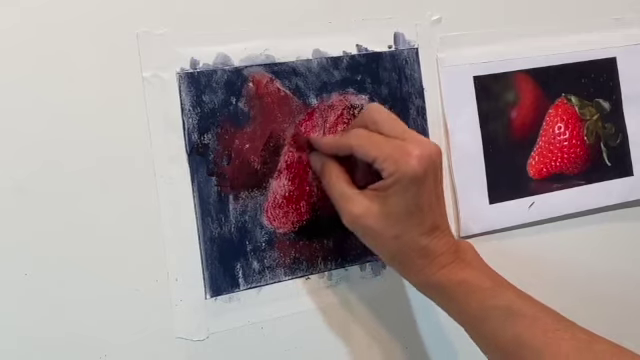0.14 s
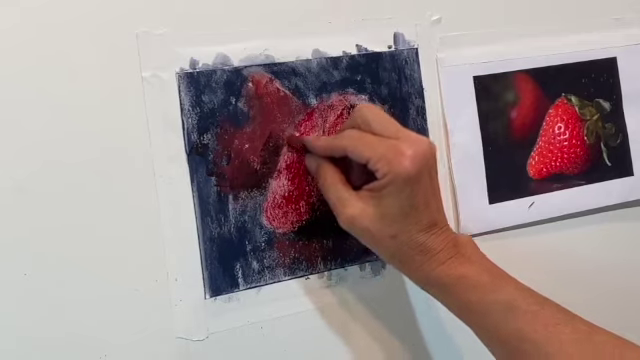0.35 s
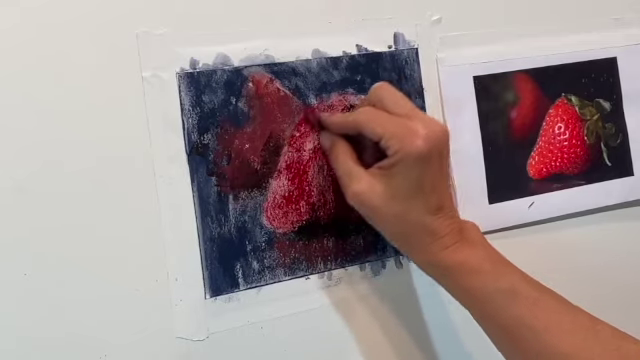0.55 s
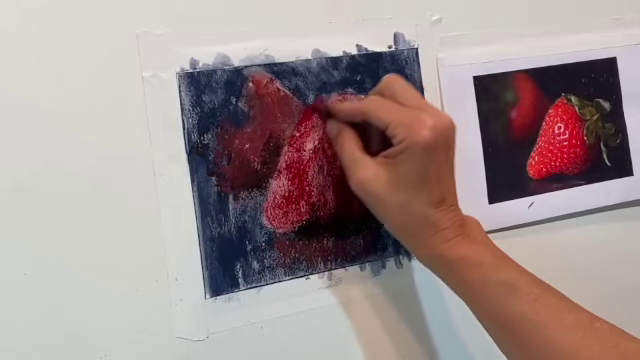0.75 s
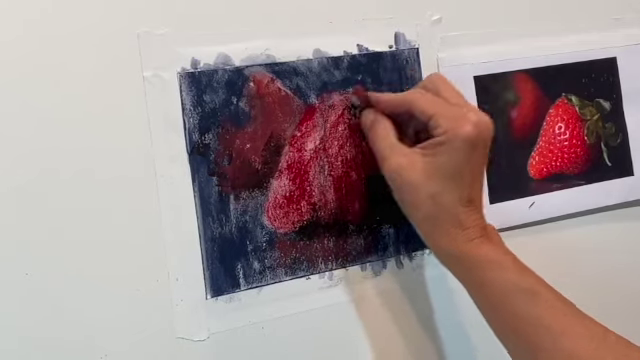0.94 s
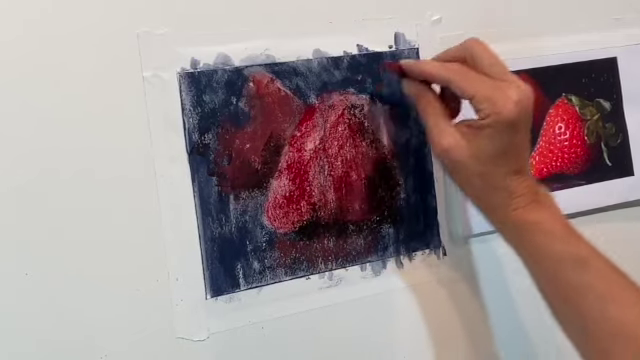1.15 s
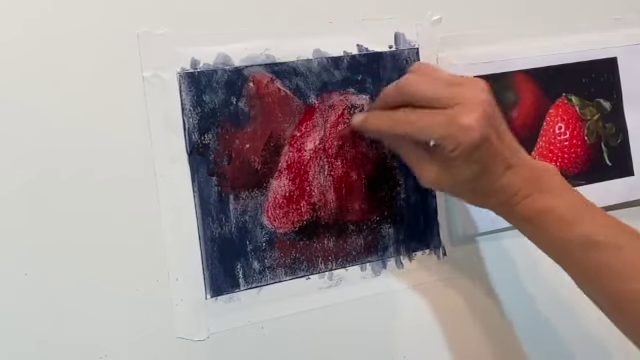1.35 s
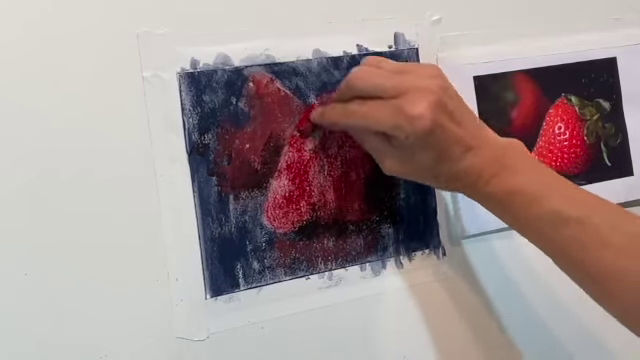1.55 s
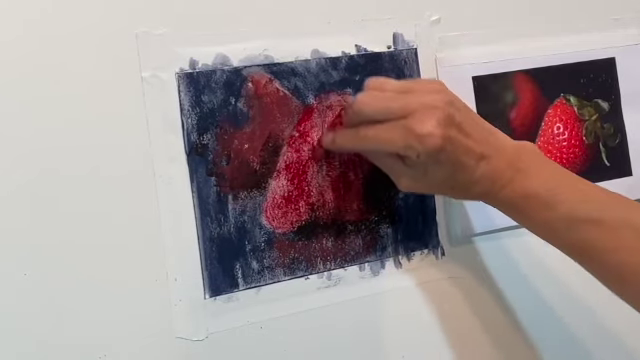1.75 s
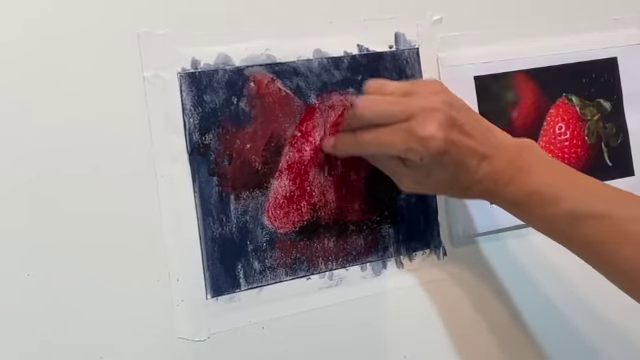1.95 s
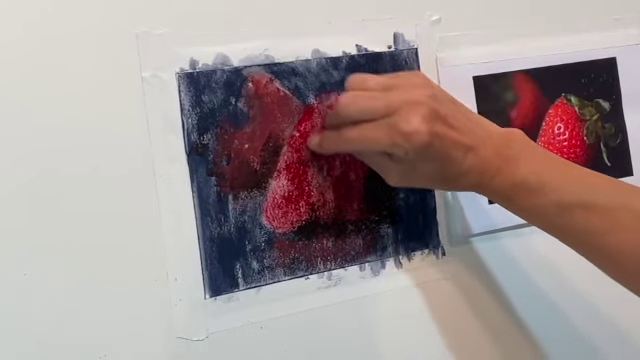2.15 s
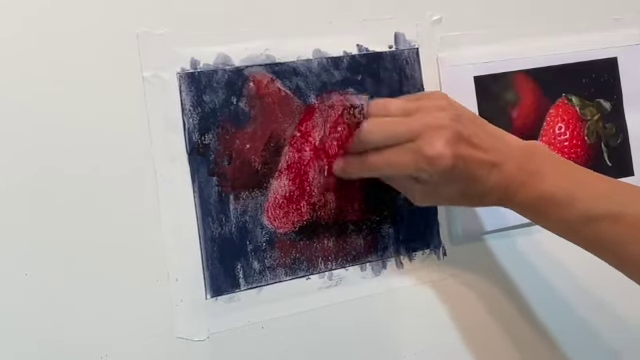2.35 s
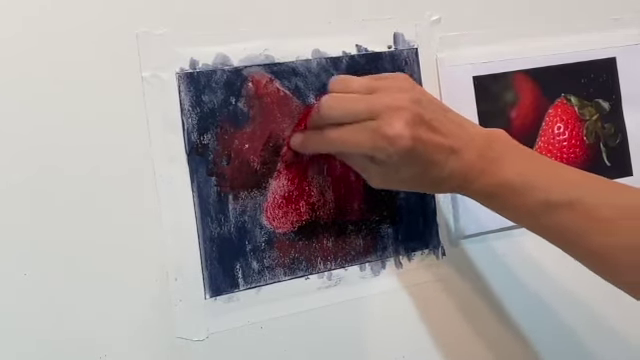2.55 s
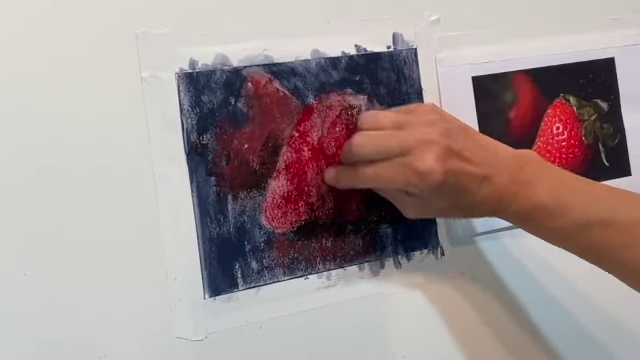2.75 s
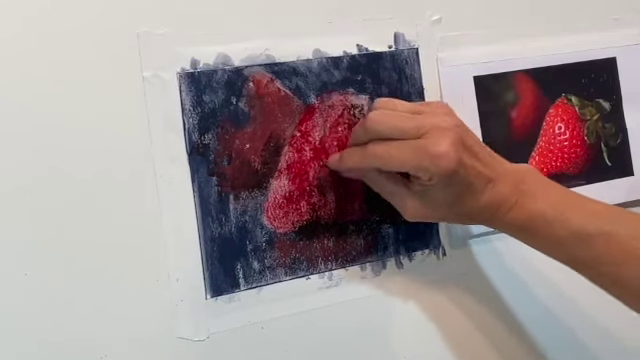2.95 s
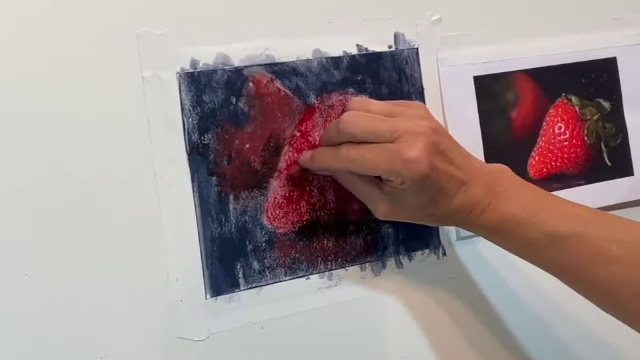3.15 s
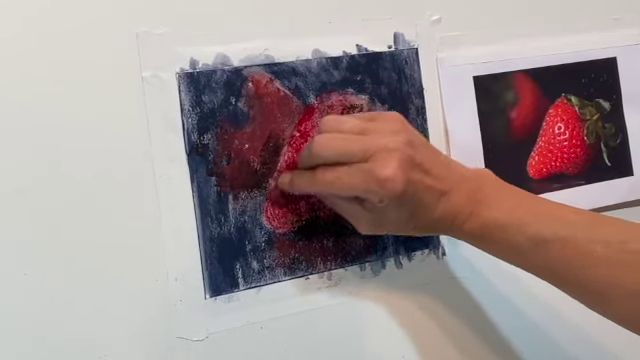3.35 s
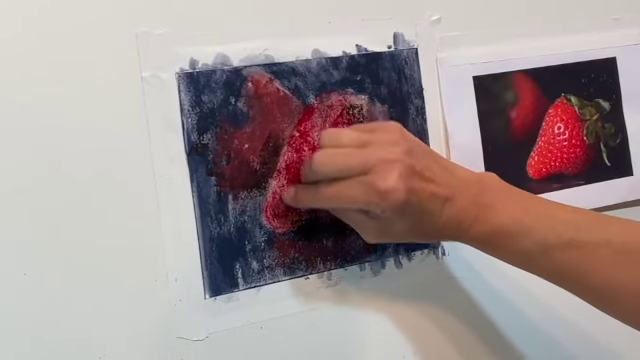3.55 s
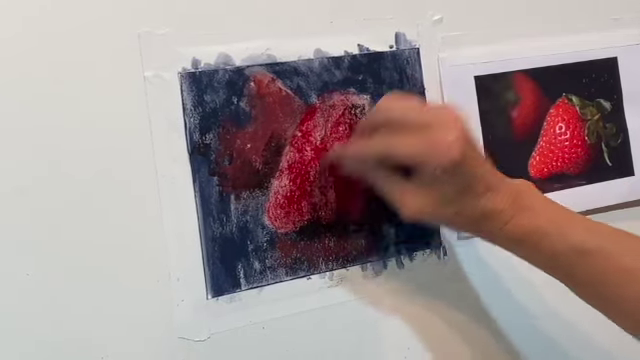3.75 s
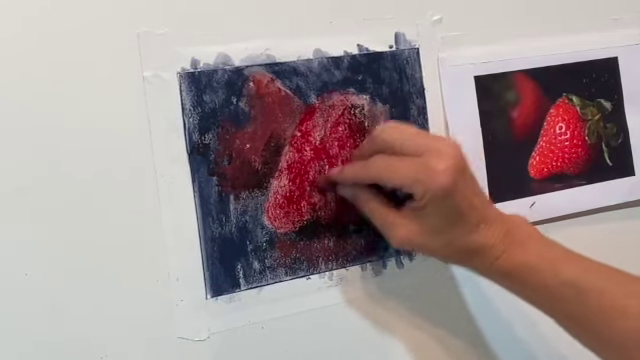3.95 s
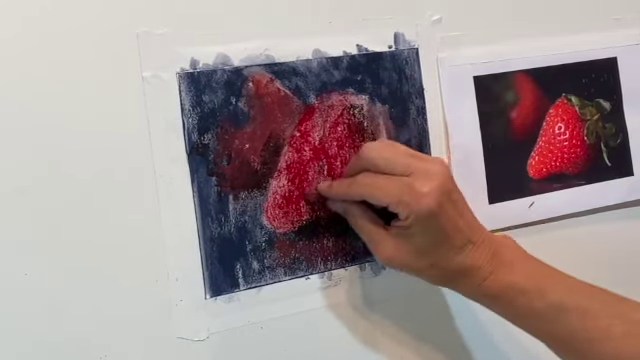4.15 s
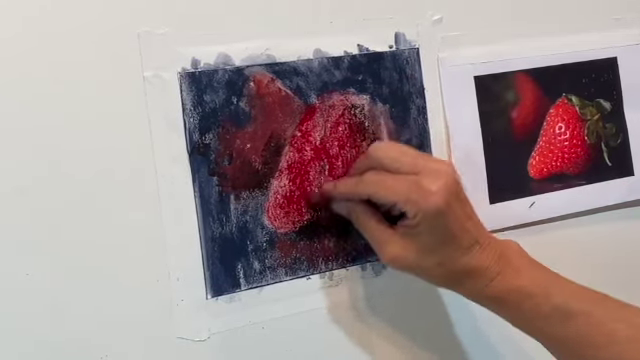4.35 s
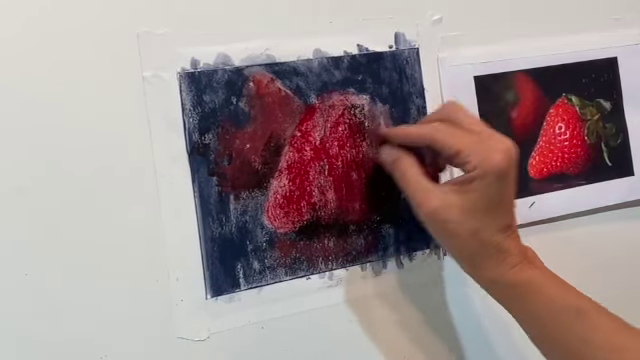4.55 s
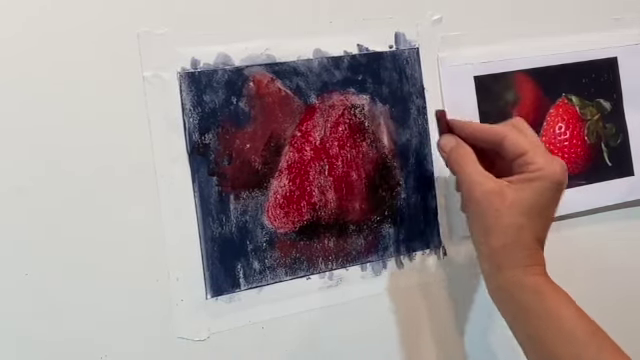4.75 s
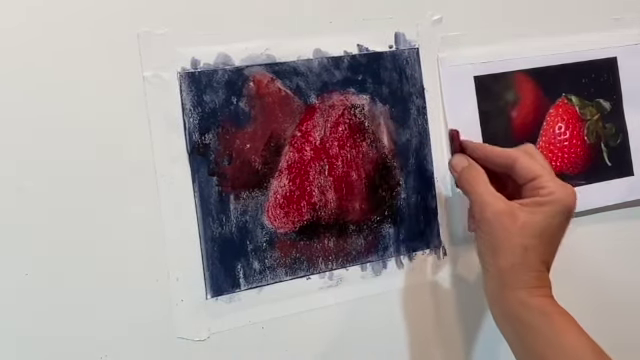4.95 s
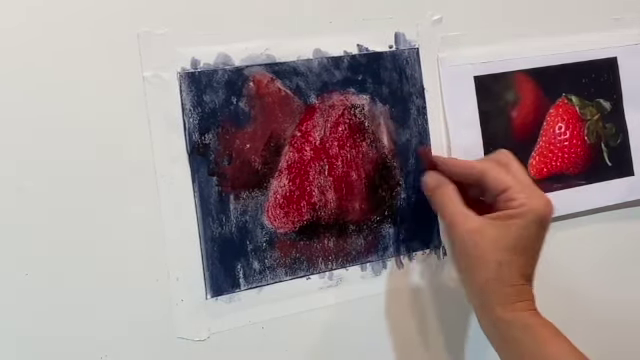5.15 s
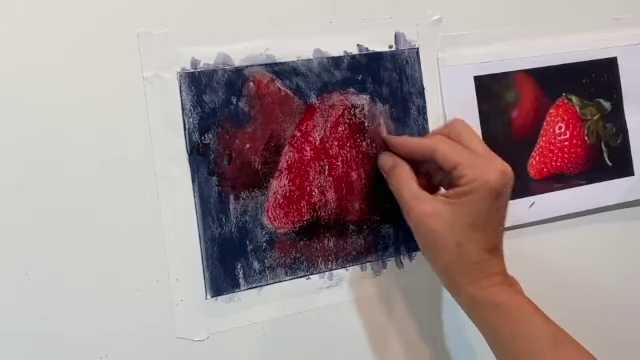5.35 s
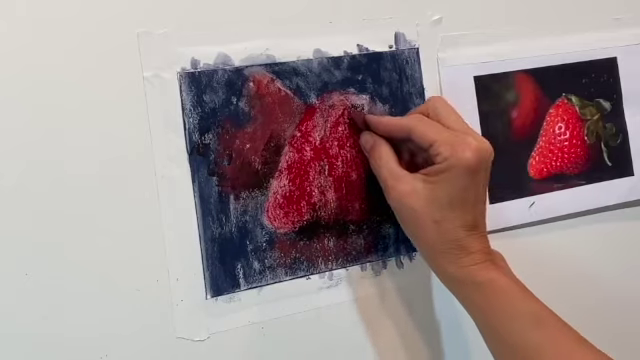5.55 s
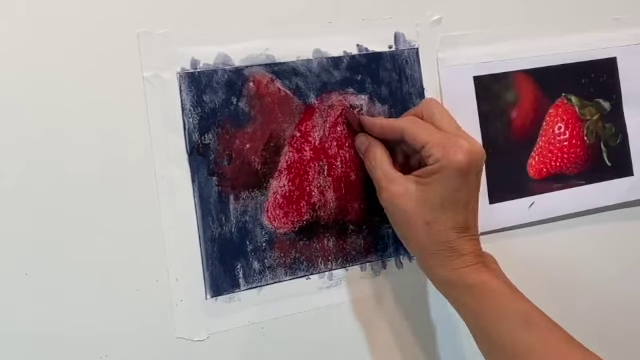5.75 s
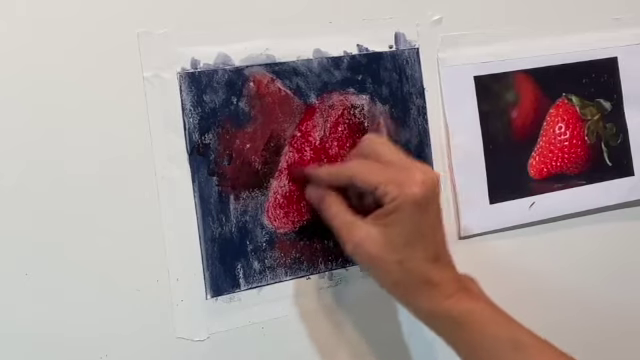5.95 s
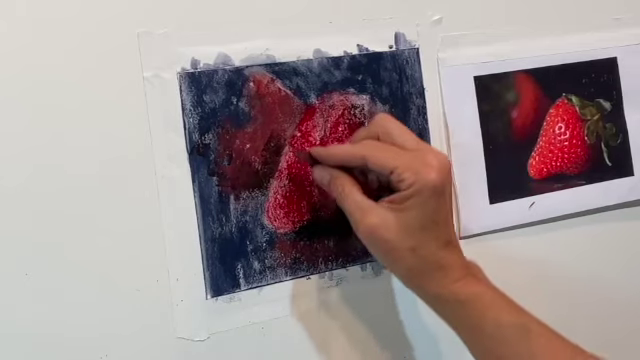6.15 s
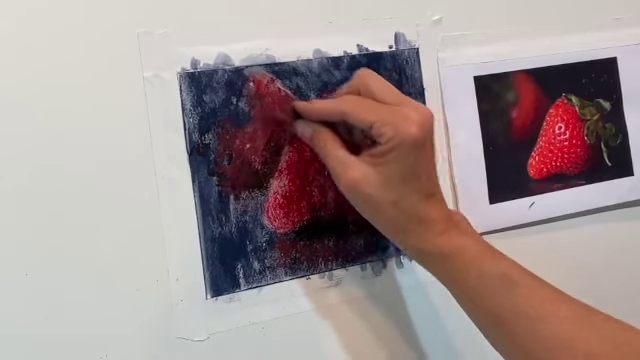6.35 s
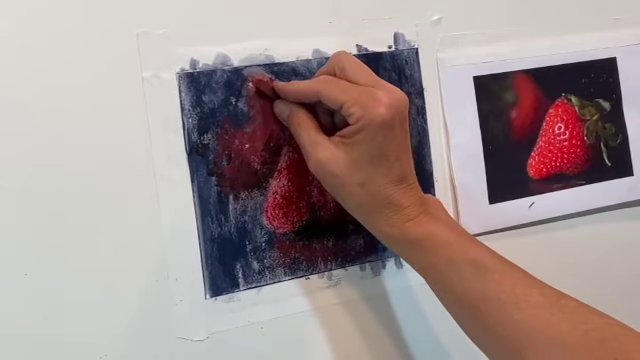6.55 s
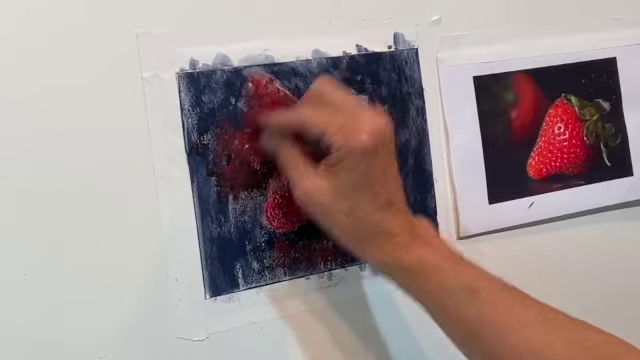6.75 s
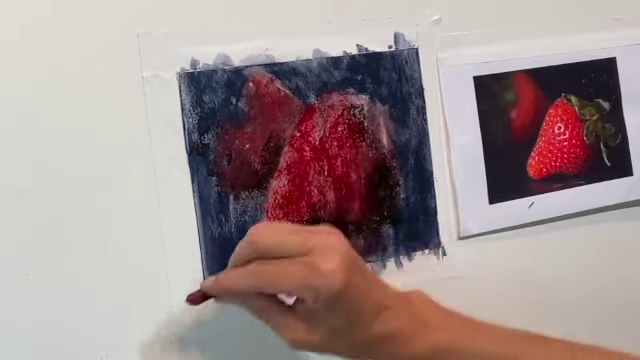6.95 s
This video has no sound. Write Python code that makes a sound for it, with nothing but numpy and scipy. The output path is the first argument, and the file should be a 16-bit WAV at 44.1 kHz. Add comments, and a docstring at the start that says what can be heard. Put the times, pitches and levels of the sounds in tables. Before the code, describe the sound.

A hard pastel stick rubs over rough paper in a quick run of short, dry, scratchy strokes. After a brief pause a second run follows, and the hand and stick land with several dull knocks on the drawing board. The strokes thin out, stop for over a second, then return as two brighter scratches with a soft bump between them. The microphone is close, in a quiet studio with a faint low rumble.

```python
"""A hard pastel stick is rubbed in short strokes over sanded paper taped to a drawing board.
Grit tears crumbs off the stick, and the many small fractures sum to a dense hiss that resonances of
paper and board colour. Stick and hand land with knocks that excite the board's damped modes.
Faint treble puffs, distant whistles and the rumble of a quiet studio lie underneath.
A phone close by spreads the sound over two channels by phase differences."""
import sys
import numpy as np
from scipy import signal
from scipy.fft import rfft, irfft, next_fast_len
from scipy.io import wavfile
from scipy.ndimage import uniform_filter1d

SR = 44100
rng = np.random.default_rng(int(sys.argv[2]) if len(sys.argv) > 2 else 0)


def master(y):
    """Save y as 16-bit WAV."""
    cut = np.clip(np.atleast_2d(y).T, -1, 1)
    pcm = np.round(cut * 32767)  # scale
    wavfile.write(sys.argv[1], SR, pcm.astype(np.int16))


N = 312839
T = np.arange(N) / SR
FFT_SIZE = next_fast_len(N + SR)
HZ = np.fft.rfftfreq(FFT_SIZE, 1 / SR)

# Strokes of the stick. Each row: start, rise, hold and fall in seconds, level in dB, rasp, fine grit and
# board drone in dB over the hiss, brightening from start to end in dB, relative tail level in dB.
STICK_STROKES = [(-0.06, 0.069, 0.023, 0.093, -37.5, -2, -4, -9, -1.5, -13.5),
                 (0.107, 0.029, 0.03, 0.078, -43.5, -7, -5.5, -4.5, 1, -13),
                 (0.226, 0.089, 0.038, 0.089, -38.5, -1, -1.5, -9, 1, -16),
                 (0.415, 0.059, 0.018, 0.092, -41, -5, -5.5, -7, -2.5, -14.5),
                 (0.564, 0.086, 0.069, 0.054, -40.5, 3.5, 4, -6, 18, -10.5),
                 (1.435, 0.035, .005, 0.071, -54, -4, -5, 4.5, 4, -14),
                 (1.543, 0.12, 0.036, 0.12, -38, -2.5, -2.5, -7.5, 0.5, -16),
                 (1.78, 0.065, 0.028, 0.082, -42, 1, -2, -6, -1, -16.5),
                 (1.939, 0.019, 0.0056, 0.069, -43, -7, -9, -7.5, .5, -17),
                 (2.009, 0.071, 0.089, 0.082, -37, -2, -1.5, -5.5, 4, -17),
                 (2.227, 0.037, .005, .035, -48.5, 1.5, -2, 0, -1, -11.5),
                 (2.477, 0.087, 0.083, 0.11, -40, -1.5, -1, -5.5, 4.5, -17),
                 (3.153, 0.092, 0.0088, .11, -40.5, -10, -6.5, -5.5, -4, -18),
                 (3.393, 0.072, 0.098, 0.064, -40.5, -9.5, -8.5, -5.5, 2, -13.5),
                 (3.99, 0.12, 0.014, 0.092, -43, -3.5, -3.5, -5, -4.5, -15),
                 (4.215, .027, 0.004, 0.029, -57, -7, -12, -1.5, .5, -14),
                 (5.666, 0.13, 0.02, 0.052, -38, 10, 11, -6, -13.5, -12),
                 (6.397, 0.0072, 0.029, 0.086, -55, -5.5, 0.5, 10, 14, -18),
                 (6.545, 0.1, 0.016, 0.068, -39, 1, 4.5, -4.5, 12, -15)]
# Scuffs as stick or hand lands. Each row: start in seconds, level in dB, T60 in seconds,
# then rasp, fine grit and board drone in dB over the hiss.
LANDING_SCUFFS = [(0.955, -75, 0.13, -5, -5, 19), (1.445, -57.5, .15, -8, -13, 4),
                  (2.41, -66.5, 0.23, -4, 10, 11), (2.439, -47, .15, -20, -8, 10),
                  (2.46, -52, .06, -8, 0, 5), (2.858, -43.5, 0.19, -19, -13, 11.5),
                  (3.02, -74, 0.58, -13, -1, 19), (3.15, -49.5, 0.23, -21, -6, 5),
                  (3.408, -54, 0.204, -8, -9, 0), (3.709, -51, .09, -15, -6, 8),
                  (3.744, -64.5, 0.23, -15, -3, 19.5), (3.908, -75, 0.17, -19, 0, 9),
                  (3.953, -59, .13, -9, -10, 18), (4.307, -65, 0.17, -4, 2, 1),
                  (4.346, -61, 0.17, -3, 3.5, -1), (5.493, -68, 0.23, -5, 1.5, -3),
                  (5.57, -75.5, 0.15, 4, -5.5, -1), (5.677, -62.5, .2, 5.5, 12.5, -3.5),
                  (6.115, -73.5, 0.19, -7, -3, 2), (6.4, -43, .09, -18, -20, 3),
                  (6.552, -60.5, .2, -2, -1, 1)]
# Spectrum of breaking crumbs. Each row: frequency in Hz, relative density in dB.
CRUMB_SPECTRUM = [(60, -3), (150, 2.5), (500, -3), (900, 0), (2500, -3), (4000, -6.5), (5600, -10.5),
                  (8500, -8), (12500, -7.5), (15500, -9.5)]
# Resonances of paper and board under the stick. Each row: centre and bandwidth in Hz, gain in dB.
SHEET_RESONANCES = [(244.4, 62, 3.5), (732, 60, 4.5), (1110, 128, 5), (1438, 46, 0.5), (1680, 38, -1),
                    (1983, 72, -3), (2580, 400, -2.5), (3950, 91, -21.5)]
# Impacts of stick and hand. Each row: start in seconds, peak in dB, contact time in milliseconds,
# palm weight in dB, boom in dB, share of the ring time, relative tick level in dB.
BOARD_KNOCKS = [(1.444, -41, 1.2, -8, -20, 1, -3), (1.953, -49.5, 1.3, -20, -11, 0.93, -4),
                (2.439, -26, 2.1, -7, -9.5, 0.86, -14), (2.46, -37, 2.2, -11, -14, 0.81, -20),
                (2.489, -27, 1.4, -9, -26, 0.39, -13), (2.86, -19.5, 0.86, -18, -8.5, 1, -55),
                (3.021, -32.5, 1.66, -11.5, -13, 0.52, -38), (3.149, -32, 0.99, -6, -1.5, 0.56, -30),
                (3.17, -41, 0.62, -17, -11, 0.7, -15), (3.407, -56, 0.61, -1, -4, 0.7, -6),
                (3.707, -26.5, 1.3, -9.5, -4, 1, -44), (3.908, -40.5, 2.4, -8, -17, 0.83, -32),
                (3.953, -40.5, 2.7, -22, -18.5, 0.58, -24), (4.24, -52.5, 1.2, -18, -9, 0.7, -3.5),
                (4.309, -47, 1.8, -10, -7, 0.79, -16), (4.346, -43.5, 1.9, -18, -8.5, 0.94, -22),
                (5.494, -50.5, 0.57, -12, -15, 0.33, -8), (6.4, -37, 0.58, 0, -1, 0.58, -6),
                (6.42, -35.5, 1.7, 2.5, -3, 0.39, -2), (6.462, -46.5, 3, -5, -14, 0.96, -30)]
# Modes of the board. Each row: frequency in Hz, gain in dB, T60 in seconds before the hand damps it.
BOARD_MODES = [(53, -1.5, 0.9), (72.4, 8, 0.33), (88.75, 1.5, 0.85), (111.8, 4.5, .5), (156.1, 5.5, 0.25),
               (198.2, -0.5, 0.13), (239.3, -7, 0.31), (278, -4.5, 0.18), (314, -13.5, 0.24),
               (421.5, -8.5, 0.19), (458, -7, 0.23), (572, -9, 0.1), (700, -11.5, 0.11), (929, -6, 0.084),
               (1140, -17.5, 0.14), (1440, -19, 0.14), (1670, -18.5, 0.04), (2447, -22.5, .08)]
# Puffs as the hand moves in the air. Each row: start in seconds, relative peak in dB, length in seconds.
AIR_PUFFS = [(0.942, -71, 0.039), (1.27, -67, 0.042), (2.967, -66, 0.08), (3.0694, -68, 0.042),
             (3.853, -68, 0.038), (4.541, -71.5, 0.041), (4.707, -78.5, 0.037), (4.917, -66, 0.036),
             (5.128, -71, 0.052), (5.565, -71, 0.029), (6.107, -66.5, 0.052), (6.315, -72.5, 0.046),
             (6.991, -74, 0.051)]
# Far whistles, perhaps a bird. Each row: start and length in seconds, starting pitch in Hz, peak in dB.
FAR_WHISTLES = [(4.6, .06, 3600, -92), (4.665, .05, 3300, -89), (4.7, .08, 2600, -89),
                (4.955, .085, 8000, -89), (5.05, .09, 7400, -91), (5.14, .08, 6800, -95)]
# Spectrum of the studio's rumble and air. Each row: frequency in Hz, relative density in dB.
STUDIO_SPECTRUM = [(15, -28.5), (25, 0.5), (92, -9), (135, -13), (164, -10.5), (323, -17.5), (356, -16),
                   (499, -30), (733, -28), (1000, -29.5), (1080, -41), (4940, -57), (8000, -61.5),
                   (10400, -77.5), (17600, -120)]
# Spectra of the puffs and the microphone's hiss. Each row: frequency in Hz, relative density in dB.
PUFF_SPECTRUM = [(2000, -15), (7500, -23.5), (9500, 14.0), (15000, -17.0)]
MIC_SPECTRUM = [(6000, -5.5), (8500, 2.5), (10500, -0.5), (12600, -7.0), (13200, -19), (16000, -22)]
# Phase between left and right. Each row: frequency in Hz, phase difference in half turns.
CHANNEL_PHASE = [(0, 0), (170, .08), (450, .08), (520, -.14), (800, -.32), (1000, -.42), (1500, -.36),
                 (2200, 0), (7400, 0), (8700, 1), (9550, 1), (10700, 2), (11400, 2), (12900, 3), (13650, 3),
                 (14900, 4)]

HISS_POWER, RASP_POWER, DRONE_POWER = 2.13, 1.72, 0.62  # amplitude follows speed to these powers
SCUFF_RISE_S, TAIL_T60_S = .003, 0.32
STUDIO_DB, MIC_HISS_DB = -55.5, -91.5
ROOM_T60_S, ROOM_DB = .28, -15
FLUTTER_RAD, FLUTTER_PER_S = 1.3, 120


def rubbing():
    """Friction noise: crumbs of many sizes break off and drive the resonances of paper and board."""
    crumbs = rng.standard_normal(N)
    crumbs *= undb(1.3 * rng.exponential(size=N) + 0.5 * walk(300) + 1.3 * walk(40))
    crumbs = shape(crumbs, spectrum(CRUMB_SPECTRUM))
    # the stick wanders over the board, so the strong resonances and the many small ones come and go
    rings = sum(undb(db + 4.2 * walk(6)) * shape(crumbs, 1 / (1 + 1j * (HZ - hz) * 2 / width))
                for hz, width, db in SHEET_RESONANCES)
    small_modes = sum(undb(2.4 * walk(7)) * shape(crumbs, diffuse_tail(0.076)) for _ in range(3))
    sheet = crumbs + rings + undb(-7.0) * small_modes
    low, mid, high = (1 / (1 + (HZ / hz) ** 5) for hz in (950, 3000, 7500))  # low-pass gains
    bands = mid - low, high - mid, 1 - high, low  # hiss, rasp, fine grit, drone
    envelopes = np.sqrt(stroke_power() + scuff_power())  # incoherent sources add in power
    return sum(envelope * set_rms(shape(sheet, band), 0) for envelope, band in zip(envelopes, bands))


def stroke_power():
    """Each friction band follows a power law of speed; a short room tail lingers after each stroke."""
    power = np.zeros((4, N))
    exponents = np.array([[HISS_POWER], [RASP_POWER], [RASP_POWER], [DRONE_POWER]])
    for start, rise, hold, fall, db, rasp_db, fine_db, drone_db, brighten_db, tail_db in STICK_STROKES:
        span = slice(max(int(start * SR), 0), int(start * SR) + SR)
        t, length = T[span] - start, rise + hold + fall
        speed = np.sin(np.pi / 2 * np.clip(np.minimum(t / rise, (length - t) / fall), 0, 1))
        tail_onset = np.clip((t - rise - hold) / fall, 0, 1)
        tail = tail_onset * undb(tail_db - 60 * np.maximum(t - length, 0) / TAIL_T60_S) ** 2
        tilt_db = brighten_db * (np.minimum(t / length, 1) - .5)
        full_power = band_power(db, rasp_db + tilt_db, fine_db + tilt_db, drone_db)
        power[:, span] += full_power * (speed ** (2 * exponents) + tail)
    return power


def scuff_power():
    """Transient friction: the power of a landing rises almost at once and decays exponentially."""
    power = np.zeros((4, N))
    for start, db, t60, *balance_db in LANDING_SCUFFS:
        t = np.maximum(T - start, 0)
        power += band_power(db - 60 * t / t60, *balance_db) * np.minimum(t / SCUFF_RISE_S, 1)
    return power


def band_power(db, rasp_db, fine_db, drone_db):
    """Partition of power: hiss and rasp share the level; fine grit and drone are set by the hiss."""
    bands_db = np.array(np.broadcast_arrays(db, db + rasp_db, db + fine_db, db + drone_db))
    return undb(2 * bands_db) / (1 + undb(2 * rasp_db))


def knocks():
    """Modal superposition: each impact rings the board's damped modes, led by a short tick of grit."""
    out, t = np.zeros(N + SR), T[:SR // 2]
    hz, mode_db, t60 = np.transpose(BOARD_MODES)[:, :, None]
    mode = np.arange(len(BOARD_MODES))[:, None]
    palm_modes, boom_modes = mode < 3, (mode == 3) | (mode == 4)
    for start, db, contact_ms, palm_db, boom_db, ring_share, tick_db in BOARD_KNOCKS:
        scatter = rng.standard_normal((len(BOARD_MODES), 2))
        gain = undb(mode_db + 2.5 * scatter[:, :1] + palm_db * palm_modes + boom_db * boom_modes)
        gain /= 1 + (hz * contact_ms / 1000) ** 2  # longer contact excites the upper modes less
        detuned_hz = hz * (1 + .015 * scatter[:, 1:])
        swell = 1 - np.exp(-t * hz / 0.51)  # low modes build up more slowly
        fade = undb(-60 * t / (t60 * ring_share))  # a hand left on the board damps it
        ring = np.sum(gain * swell * fade * np.sin(2 * np.pi * detuned_hz * t), axis=0)
        tick = signal.lfilter([.3], [1, -.8], rng.standard_normal(len(t))) * np.exp(-t / 0.0021)
        i = int(start * SR)
        out[i:i + len(t)] += undb(db) * (ring / np.abs(ring).max() + undb(tick_db) * tick)
    return out[:N]


def puffs():
    """Amplitude modulation: Gaussian envelopes shape treble noise into soft bursts."""
    swell = sum(undb(db) * np.exp(-(2 * (T - start) / length - 1) ** 2)
                for start, db, length in AIR_PUFFS)
    return swell * set_rms(noise(spectrum(PUFF_SPECTRUM)), -6)


def whistles(sag_per_s=.5):
    """Linear chirps: each distant tone sinks a little in pitch under a half-sine envelope."""
    out = np.zeros(N)
    for start, length, hz, db in FAR_WHISTLES:
        t = np.clip(T - start, 0, length)
        phase = 2 * np.pi * hz * t * (1 - sag_per_s * t / 2)
        out += undb(db) * np.sin(np.pi * t / length) * np.sin(phase)
    return out


def room(x):
    """Reverberation: a short, dull tail of reflections adds to the direct sound."""
    reflections = undb(ROOM_DB) * diffuse_tail(ROOM_T60_S) / (1 + 1j * HZ / 5000)
    return shape(x, 1 + reflections)


def studio():
    """Noise floor: low rumble swells unevenly over steady air and the microphone's self-noise."""
    below_150, below_900 = (1 / (1 + (HZ / hz) ** 4) for hz in (150, 900))
    bands = below_150, below_900 - below_150, 1 - below_900
    deep, low, air = (noise(spectrum(STUDIO_SPECTRUM) * band) for band in bands)
    ambience = deep * undb(2.2 * walk(6)) + low * undb(1.3 * walk(8)) + air
    return set_rms(ambience, STUDIO_DB) + set_rms(noise(spectrum(MIC_SPECTRUM)), MIC_HISS_DB)


def diffuse_tail(t60):
    """Diffuse decay: the frequency response of exponentially dying noise, with mean power 1."""
    t = T[:SR // 2]
    burst = rng.standard_normal(len(t)) * undb(-60 * t / t60)
    return rfft(burst / np.sqrt(np.sum(burst ** 2)), FFT_SIZE)


def walk(rate):
    """Random modulation: `rate` levels a second, smoothed twice, with a deviation near 1."""
    hold = int(SR / rate)
    steps = np.repeat(rng.standard_normal(N // hold + 1), hold)
    return 1.07 * uniform_filter1d(uniform_filter1d(steps, hold), hold)[:N]


def noise(gain):
    """Coloured noise: white noise weighted by a gain at each frequency."""
    return shape(rng.standard_normal(N), gain)


def shape(x, gain):
    """Linear filtering: the spectrum is multiplied by a frequency response."""
    return irfft(rfft(x, FFT_SIZE) * gain, FFT_SIZE)[..., :N]


def spectrum(points):
    """Spectral envelope: gain through (Hz, dB) points in log frequency, -60 dB below the first."""
    hz, db = np.transpose(points)
    return undb(np.interp(np.log(HZ + 1), np.log(hz), db, left=-60))


def set_rms(x, db):
    """Normalisation to an RMS level in dB."""
    return x * undb(db) / np.sqrt(np.mean(x ** 2))


def undb(db):
    """Amplitude ratio of a level in dB."""
    return 10 ** (np.asarray(db) / 20)


def scene():
    """Superposition: all sources sum at one point of pickup, the same on both channels."""
    return np.tile(room(rubbing() + knocks() + puffs() + whistles()) + studio(), (2, 1))


def record(dry):
    """Mid-side stereo: the channels part in phase, the side flutters, deep bass and top are cut."""
    half_phase = np.pi / 2 * np.interp(HZ, *np.transpose(CHANNEL_PHASE))
    flutter = FLUTTER_RAD * walk(FLUTTER_PER_S)
    mid = shape(dry, np.cos(half_phase))
    quadrature, in_phase = shape(dry, 1j * np.sin(half_phase)), shape(dry, np.sin(half_phase))
    side = np.cos(flutter) * quadrature + np.sin(flutter) * in_phase
    stereo = mid + side * np.array([[-1], [1]])
    stereo = signal.sosfilt(signal.butter(4, 32, "high", fs=SR, output="sos"), stereo)
    return signal.sosfilt(signal.ellip(10, .2, 60, 15700, "low", fs=SR, output="sos"), stereo)


dry = scene()
out = record(dry)
master(out)
```